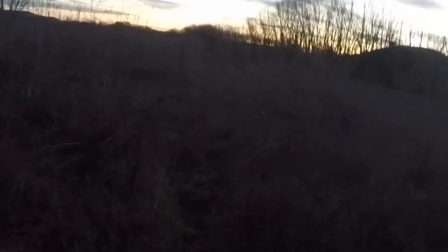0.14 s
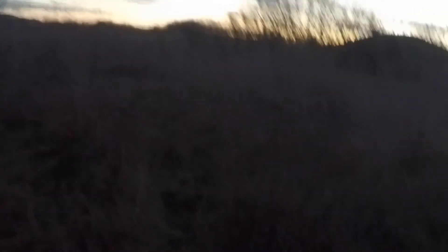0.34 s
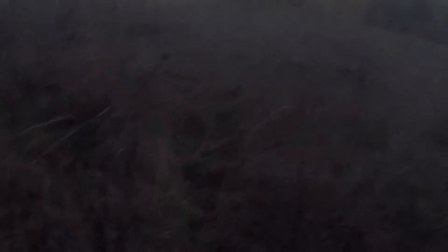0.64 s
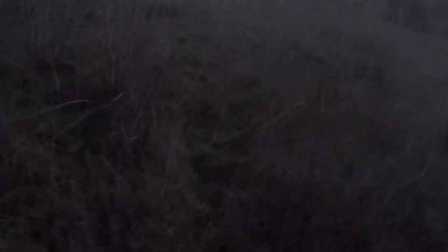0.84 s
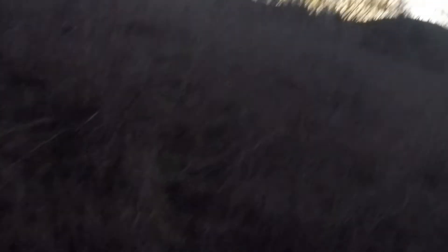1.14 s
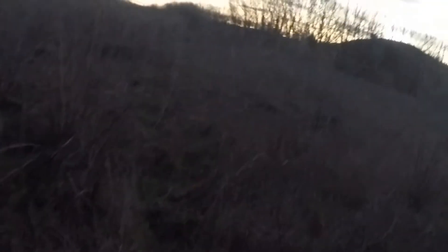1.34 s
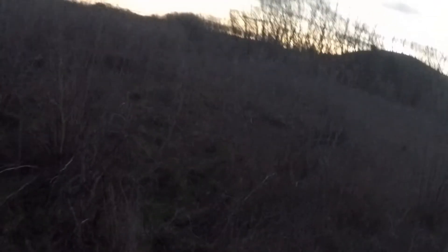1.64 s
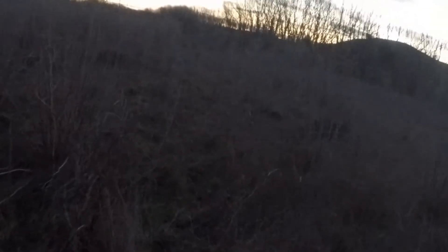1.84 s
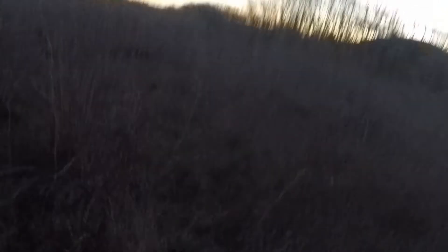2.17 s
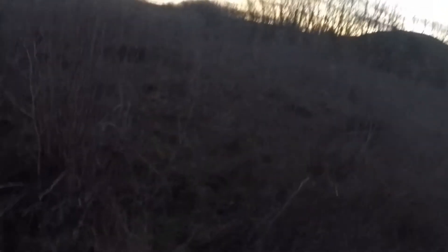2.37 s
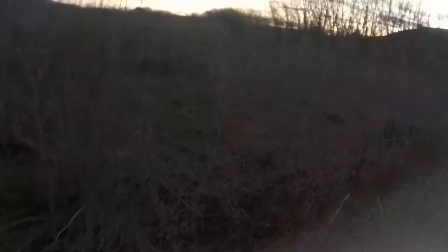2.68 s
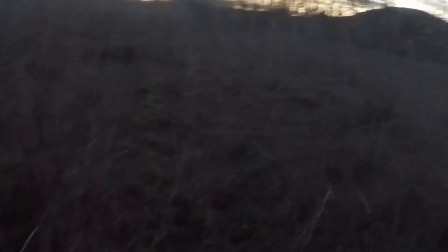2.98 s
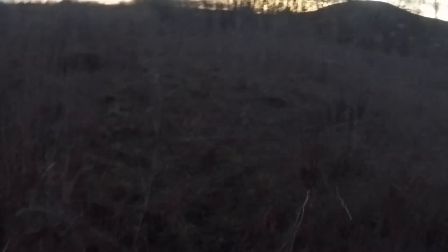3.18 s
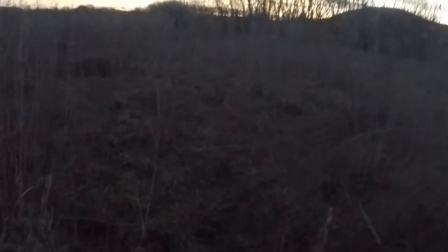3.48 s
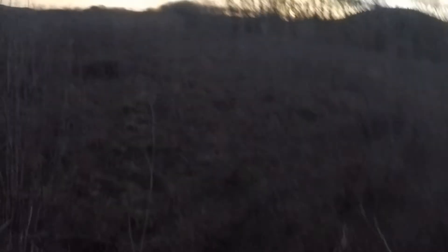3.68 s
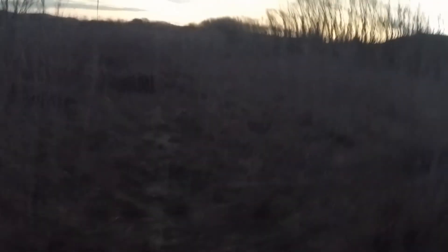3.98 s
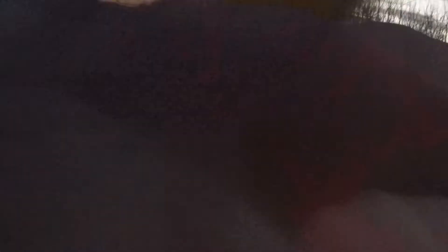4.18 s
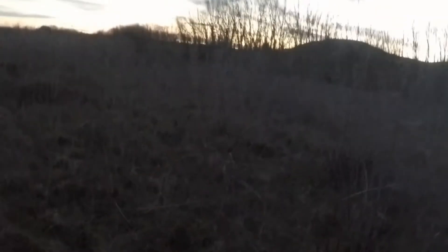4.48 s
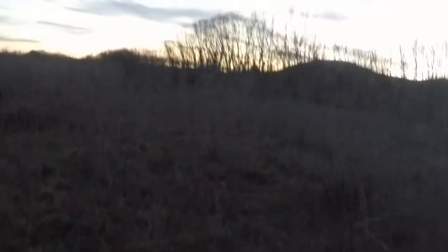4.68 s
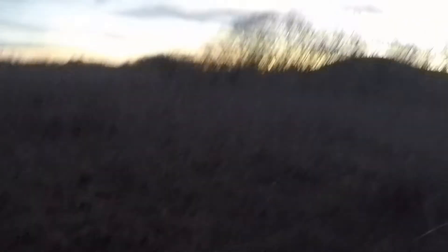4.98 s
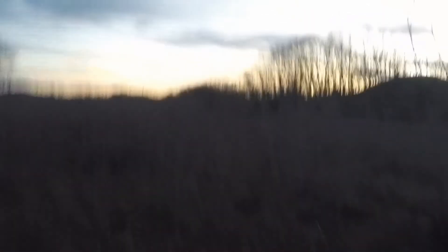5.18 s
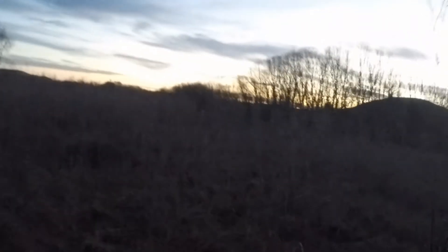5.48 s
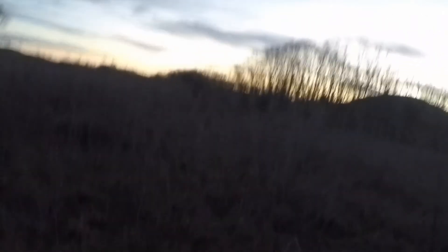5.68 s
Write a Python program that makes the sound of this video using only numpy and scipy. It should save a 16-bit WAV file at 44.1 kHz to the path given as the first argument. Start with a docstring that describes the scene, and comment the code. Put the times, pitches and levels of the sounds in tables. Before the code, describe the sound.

Someone carries a small camera through dry grass on a quiet hillside. Soft rustling and a low hand rumble run underneath as fingers and stalks scrape over the housing in short, uneven strokes. From about halfway, the grip shifts with sharp clicks, knocks and dull thumps right at the microphone. The loudest cracks come near the end and briefly overload it, then the noise dies down. There is no echo.

```python
"""A hand-held camera in dry grass.

Someone walks over a quiet hillside with a small camera in the hand. Fingers and stalks scrape over
the housing by stick-slip friction. Shifts of the grip excite its resonances as clicks and knocks and
push low thumps into the microphone; the loudest peaks overload it. The movement of the hand makes
a low rumble, and the grass rustles underneath."""
import sys
import numpy as np
from scipy import signal
from scipy.fft import rfft, irfft, next_fast_len
from scipy.io import wavfile
from scipy.ndimage import uniform_filter1d

SR = 44100
rng = np.random.default_rng(int(sys.argv[2]) if len(sys.argv) > 2 else 0)


def to_wav(s):
    """Save 16-bit WAV."""
    ch = np.atleast_2d(s).T  # columns
    pcm = np.round(np.clip(ch, -1, 1) * 32767)  # PCM
    wavfile.write(sys.argv[1], SR, pcm.astype(np.int16))


N = 256794
TIME = np.arange(N) / SR
FFT_SIZE = next_fast_len(N + 4096)
FREQS = np.maximum(np.arange(FFT_SIZE // 2 + 1) * SR / FFT_SIZE, 1)

# Resonances of the housing. Each row: centre in Hz, bandwidth in Hz, boost in dB.
HOUSING_MODES = [(630, 120, 4), (910, 180, -0.5), (1400, 94, -2.5), (2090, 310, 0.5), (2464.3, 68, 4),
                 (3460, 1000, 4), (4400, 160, 7), (9700, 900, 0)]
# Unrest of the carrying hand. Each row: time in seconds, relative rumble level in dB.
HAND_SWAY = [(0.0, -35.5), (0.37, -41), (0.68, -43.5), (1.52, -31.5), (1.81, -40.5), (3.01, -25.5),
             (3.45, -28), (3.96, -21.5), (4.2, -39), (5.25, -27), (5.44, -50), (5.82, -51)]


def scrapes(catch_s=0.0025, release_s=0.006, judder_db=1.44, judder_per_s=140, gain_db=0.22):
    """Sliding friction excites the housing: each stroke catches abruptly, judders and trails off."""
    # Short strokes. Each row: start and length in seconds, crest as a share of the length, crest level
    # in dB, fade after the crest in dB, hiss and body in dB relative to the level.
    short_strokes = [(0.235, 0.083, 0.31, -64, 3, 12, -21), (0.718, 0.081, 0.51, -49, 6, -35, -8),
                     (0.896, 0.115, 0.2, -37, 2.5, -2, -14), (1.021, 0.12, 0.18, -49, 8.5, -30, -15),
                     (1.897, 0.058, 0.28, -43.5, 7, -17, -4), (2.055, 0.054, 0.43, -47.5, 8, -13.5, -9.5),
                     (2.16, 0.087, 0.44, -42, 4.5, -9, 2), (2.256, 0.13, 0.066, -38, 10, -19.5, -6.5),
                     (2.391, 0.093, 0.38, -33, 1, -11.5, -13.5), (2.484, 0.053, 0.78, -26, 5, -4.5, -14),
                     (2.562, 0.027, 0.45, -21.5, 17.5, -15, -9), (2.717, 0.048, 0.076, -39, 10, -8, -3.5),
                     (2.765, 0.056, 0.13, -30, 5.5, -5, -6.5), (2.825, 0.088, 0.66, -31, 8.5, 0.5, -3),
                     (2.943, 0.024, 0.38, -42, 6, -16, -3), (2.97, 0.15, 0.14, -29.5, 11, -7, -8),
                     (3.124, 0.054, 0.13, -41.5, 11, -4.5, -4), (3.184, 0.039, 0.64, -36, 10, -7.5, -1.5),
                     (3.235, 0.056, 0.25, -33, 17.5, -15.5, -9), (3.33, 0.061, 0.63, -31.5, 7, -3, -9.5),
                     (3.41, 0.042, 0.61, -32.5, 16, -7, -7.5), (3.468, 0.11, 0.24, -24.5, 19.5, -6.5, -7.5),
                     (3.591, 0.16, 0.14, -28.5, 18.5, -13, -11), (3.889, 0.028, .35, -40, 7.5, -27, -27),
                     (4.032, 0.04, .1, -26.5, 2.5, -14, -15), (4.069, 0.013, 0.16, -26.5, 1, -10, -15),
                     (4.401, 0.026, .1, -34, 13.5, -0.5, -24), (5.065, 0.021, 0.7, -37.5, -1, -15, -3),
                     (5.215, 0.064, .2, -49, 11, -6, -21), (5.698, 0.12, 0.17, -51.5, 1, -10, -14.5)]
    # Two long drags. Each row: time in seconds, level in dB, hiss and body in dB relative to the level.
    first_drag = [(1.143, -40.5, -14, -9.5), (1.223, -35.5, -10, -22), (1.293, -34, -11, -13),
                  (1.375, -26.5, -14, -13.5), (1.445, -28, -16, -10.5), (1.485, -34.5, -19, -22.5),
                  (1.579, -30, -8, -16), (1.611, -41, -17, -10), (1.679, -31.5, -8, -12.5),
                  (1.781, -38.5, -30.5, -11), (1.833, -46.5, -24, -5), (1.895, -48, -16, -6)]
    second_drag = [(4.527, -34, -8, -1), (4.545, -26, -10, -18.5), (4.583, -37, -5, -8),
                   (4.619, -26, -14.5, -28), (4.659, -41, -11, -15), (4.687, -27.5, -23.5, -15),
                   (4.703, -41.5, -8, -8), (4.765, -37, -28.5, -11), (4.795, -33.5, -15, -13.5),
                   (4.828, -39, -16.5, -6), (4.865, -35, -14, -4), (4.919, -40, -22, 0),
                   (4.976, -51, -9, -12)]
    # Spectrum of a scrape. Each row: frequency in Hz, relative spectral density in dB.
    spectrum = [(76, -13.5), (130, -4), (464, -24.5), (637, -14), (967, -7.5), (1330, -7), (2060, -0.5),
                (2720, -5.5), (4380, -13.5), (5030, -14.5), (15000, -30)]
    # Emphasis of the upper middle band. Each row: time in seconds, gain in dB.
    emphasis = [(0.9, -1.5), (1.4, -3.5), (1.8, -3.5), (2.5, -2.5), (3.5, 3), (4.1, 3), (4.55, -6.5),
                (4.95, -5)]
    strokes = sorted([stroke_course(*row) for row in short_strokes] + [first_drag, second_drag])
    level_db, hiss_db, body_db = curves(sorted(tuple(row) for stroke in strokes for row in stroke))
    noise = coloured(stick_slip(slips_per_s=2800, spread_db=3.4, hiss=0.6), spectrum, HOUSING_MODES)
    sliding = modulated(noise, level_db + body_db, level_db, level_db + hiss_db,
                        flicker_db=2.0, flicker_per_s=35)
    upper_middle = filtered(sliding, (2900, 5600), "band", order=1)
    sliding += (from_db(curves(emphasis)[0]) - 1) * upper_middle
    sliding *= from_db(gain_db + judder_db * drift(judder_per_s))
    out = np.zeros(N)
    next_starts = [stroke[0][0] for stroke in strokes[1:]] + [np.inf]
    for stroke, next_start in zip(strokes, next_starts):
        start, end = stroke[0][0], stroke[-1][0]
        during = (TIME > start - catch_s / 2) & (TIME < min(end + 5 * release_s, next_start))
        t = TIME[during]
        catch = np.clip((t - start) / catch_s + 0.5, 0, 1)
        release = np.exp(-np.maximum(t - end, 0) / release_s)
        out[during] += catch * release * moving_contact(sliding[during])
    return out


def stroke_course(start, length, crest, level_db, fade_db, hiss_db, body_db):
    """Friction grows louder and brighter with pressure, which builds to a crest and then eases."""
    catch_db, swell_db_per_s = 5.5, 67
    hiss_growth, body_growth = 0.24, -0.22  # dB for each dB of pressure
    rise_s = length * np.clip(crest, 0.02, 0.98)
    times = [start, start + rise_s, start + length]
    below_crest_db = [catch_db + swell_db_per_s * rise_s, 0, fade_db]
    return [(s, level_db - drop, hiss_db - hiss_growth * drop, body_db - body_growth * drop)
            for s, drop in zip(times, below_crest_db)]


def stick_slip(slips_per_s, spread_db, hiss):
    """Stick-slip friction releases tiny impulses of uneven size at random, over a smooth hiss."""
    sizes = from_db(spread_db * np.minimum(rng.exponential(1, N), 4)) * rng.choice([-1, 1], N)
    slips = sizes * (rng.random(N) < slips_per_s / SR)
    return slips / rms(slips) + hiss * rng.standard_normal(N)


def moving_contact(sound, ripple_db=4.0, dwell_s=0.11):
    """Mode excitation depends on the contact point: one pattern of resonances fades into the next."""
    size = next_fast_len(len(sound) + 2)
    spectrum = rfft(sound, size)
    hz = np.arange(size // 2 + 1) * SR / size
    ripple_axis = np.sqrt(hz * 2000) * 2 / 130  # knots 130 Hz apart at 2 kHz, wider above
    places = int(len(sound) / SR / dwell_s) + 1
    position = np.linspace(0, places - 1, len(sound))
    out = 0
    for place in range(places):
        knots = rng.standard_normal(SR // 80)
        ripple = from_db(ripple_db * np.interp(ripple_axis, np.arange(len(knots)), knots))
        crossfade = np.clip(1 - abs(position - place), 0, 1)
        out += crossfade * irfft(spectrum * ripple / rms(ripple), size)[:len(sound)]
    return out


def rasps(t60=0.02, gain_db=3.0):
    """Forced vibration: friction drives one narrow resonance for the length of a slide."""
    # Pitched slides. Each row: start and length in seconds, pitch in Hz, relative level in dB.
    slides = [(0.739, 0.043, 1400, -51.5), (0.74, 0.035, 2230, -49), (0.892, 0.095, 3510, -35),
              (1.284, 0.086, 700, -49), (2.771, 0.061, 2230, -32), (2.83, 0.069, 956, -34),
              (2.972, 0.045, 850, -36.5), (3.594, 0.035, 4400, -33), (4.6, 0.11, 1990, -48)]
    out = np.zeros(N)
    for start, length, hz, db in slides:
        size = int(length * SR)
        tone = ring(rng.standard_normal(SR // 2)[:size], hz, t60)
        add(out, start, from_db(db + gain_db) * tone / rms(tone) * signal.windows.tukey(size))
    return out


def clicks(ring_cycles=5, chatter_s=0.0015, tail_s=0.012, snap_s=0.0012, crack_s=0.00048, gain_db=-2.5):
    """A hard impact is broadband: a brief tone and housing modes sound with a snap, crack and push."""
    # Clicks of the grip. Each row: time in seconds, relative level in dB, pitch in Hz, brightness in dB.
    impacts = [(0.385, -40.5, 1550, 7.5), (0.418, -40, 1770, -20), (2.5738, -7.5, 1490, -11),
               (2.715, -20.5, 3420, -1), (2.7709, -9.5, 2300, -14), (2.975, -13.5, 950, -14),
               (3.34, -12, 1690, -7), (3.7128, -7, 1920, 2.5), (3.756, -14.5, 2310, -18),
               (3.7976, -8.5, 1600, -17), (3.8222, -0.5, 1900, -30), (3.933, -8, 2130, -39),
               (3.9564, -5.5, 1890, -23.5), (3.9651, 3, 2100, -9), (3.9748, 0.5, 2700, -4),
               (4.076, 4.5, 2510, -4), (4.0914, -10.5, 2130, 3.5), (4.3986, -19.5, 1760, -1),
               (4.5306, -18, 1990, -22.5), (4.9865, -9.5, 1750, -1), (4.9999, -7.5, 3150, 0),
               (5, -5, 9500, -12), (5.0236, -6.5, 2240, 7), (5.0255, -2, 2300, -6.5),
               (5.0605, -13.5, 2090, -45), (5.118, 12.5, 1900, -5), (5.2649, -19, 1380, -7),
               (5.273, -22, 3770, -19.5), (5.3863, -18.5, 1930, -3), (5.716, -26.5, 1990, -42)]
    out, t = np.zeros(N), TIME[:SR // 24]
    impulse = 1.0 * (t == 0) + 1e-18
    for start, db, hz, bright_db in impacts:
        chatter, crack_noise, strengths, shifts, snap_noise = rng.standard_normal((5, len(t)))
        chatter_decay = np.exp(-t / chatter_s) + from_db(-38) * np.exp(-t / tail_s)
        force = impulse + 0.32 * chatter * chatter_decay
        force = filtered(force, [hz / 2, min(4 * hz, SR / 3)], "band", order=1)
        modes = gripped_housing(force, hz, strengths, shifts)
        tap = filtered(impulse, [0.7 * hz, 2.2 * hz], "band", order=1)
        tone = ring(tap, hz, ring_cycles / hz)
        snap = filtered(snap_noise * np.exp(-t / snap_s), [1.1 * hz, 2.4 * hz], "band")
        crack = filtered(crack_noise * np.exp(-t / crack_s), [4000, 11000], "band")
        push = filtered(impulse, 480, "low")
        click = mix_peaks((tone, 0), (modes, 1), (snap, 0.09 * bright_db - 2),
                          (crack, bright_db - 7), (push, -15))
        add(out, start, from_db(db + gain_db) * click)
    return out


def gripped_housing(force, pitch_hz, strengths, shifts, focus_octaves=0.41, damping_hz=150, detune=0.037):
    """Modal response: modes near the click's pitch ring most, and the grip detunes and damps each."""
    out = 0
    for (hz, width_hz, _), strength, shift in zip(HOUSING_MODES, strengths, shifts):
        nearness = 1 / (1 + (np.log2(hz / pitch_hz) / focus_octaves) ** 2)
        loaded_hz = hz * np.exp(detune * shift)
        t60 = np.log(1000) / (np.pi * (width_hz + damping_hz))
        out += nearness * from_db(2 * strength) * ring(force, loaded_hz, t60)
    return out


def knocks(swing_cycles=0.35, push_cycles=0.32, grit_s=0.001):
    """Soft flesh damps the housing within about three cycles, with a push of air and a little grit."""
    # Fingertip knocks, the first four a quick creak. Each row: time in seconds, level in dB, pitch in Hz.
    taps = [(1.829, -29.5, 1050), (1.84, -31, 1050), (1.847, -31, 1050), (1.86, -26, 1090),
            (3.653, -14.5, 800), (3.7836, -12.5, 1150), (3.7852, -1.5, 1086), (3.7857, -7, 420),
            (5.1405, -11.5, 1400), (5.1616, -15, 1400), (5.265, -16, 257), (5.321, 4, 1364),
            (5.3436, -7.5, 1220), (5.365, -4.5, 1270)]
    out, t = np.zeros(N), TIME[:SR // 32]
    for start, db, hz in taps:
        cycles = hz * t
        swing = -np.sin(2 * np.pi * cycles) * cycles ** 2 * np.exp(-cycles / swing_cycles)
        push = -np.gradient(cycles ** 2 * np.exp(-cycles / push_cycles))
        grit = filtered(rng.standard_normal(len(t)) * np.exp(-t / grit_s), [2000, 4000], "band", order=1)
        add(out, start, from_db(db) * mix_peaks((swing, 0), (push, -9), (grit, -14.5)))
    return out


def pings():
    """Free vibration: with no finger to damp it, the housing rings on briefly after a blow."""
    # Blows on the housing. Each row: time in seconds, strength in dB.
    blows = [(2.575, -19.5), (4.077, -5.5)]
    # Freely ringing modes. Each row: frequency in Hz, gain in dB, time to fall 60 dB in seconds.
    free_modes = [(1855, -1.5, 0.071), (2380, -12.5, 0.02)]
    force = np.zeros(N)
    for start, db in blows:
        add(force, start, from_db([db]))
    return sum(from_db(db) * ring(force, hz, t60) for hz, db, t60 in free_modes)


def thumps(decay_cycles=0.41, onset_cycles=0.079, gain_db=5.5):
    """Heavily damped oscillation: a push of the hand sends one pressure swing into the microphone."""
    # Pushes of the hand. Each row: time in seconds, relative level in dB, frequency in Hz.
    pushes = [(1.387, -15, 42), (1.852, -27, 95), (2.557, -6.5, 41), (2.581, -11, 55), (2.759, -14, 53),
              (2.794, -8, 60), (2.88, -13, 52), (3.65, -7, 44), (3.679, -3.5, 39.6), (3.786, -1.5, 90),
              (3.978, -6.5, 38), (4.044, -3, 69.3), (4.088, -3.5, 39.5), (4.99, -8.5, 41.3),
              (5.027, -4, 169.7), (5.033, -6.5, 38.75), (5.266, -7.5, 80)]
    out, t = np.zeros(N), TIME[:SR // 5]
    for start, db, hz in pushes:
        cycles = hz * t
        envelope = (1 - np.exp(-cycles / onset_cycles)) * np.exp(-cycles / decay_cycles)
        add(out, start, -from_db(db + gain_db) * np.sin(2 * np.pi * cycles) * envelope)
    return filtered(out, 9.2, "high", order=1)


def rumble(gain_db=2.0, levelling_s=0.045, upper_hz=44, upper_growth=0.72):
    """Structure-borne noise swells with the movement of the hand; brisk movement reaches higher."""
    # Spectrum of the rumble. Each row: frequency in Hz, relative spectral density in dB.
    spectrum = [(16, 6.5), (30, 7.5), (47, -0.5), (66, -10.5), (130, -33), (300, -41), (2000, -120)]
    noise = coloured(rng.standard_normal(N), spectrum)
    local_power = uniform_filter1d(abs(signal.hilbert(noise)) ** 2 / 2, int(levelling_s * SR))
    even = noise / np.sqrt(local_power + 1e-12)
    upper = filtered(filtered(even, upper_hz, "high")[::-1], upper_hz, "high")[::-1]  # zero phase
    sway_db, = curves(HAND_SWAY)
    level_db = with_jolts(sway_db)
    brisk_db = (level_db + sway_db) / 2
    lift_db = np.minimum(upper_growth * (brisk_db - np.median(brisk_db)), 3.0)
    return (even + upper * (from_db(lift_db) - 1)) * from_db(level_db + gain_db)


def with_jolts(sway_db, rise_s=0.028, fall_s=0.031):
    """Incoherent sources add in power: each jolt swells and dies away on top of the hand's unrest."""
    # Jolts of the walk that reach the camera. Each row: time in seconds, relative level in dB.
    jolts = [(0.37, -27), (0.96, -30.5), (1.39, -20.5), (1.85, -30.5), (2.18, -25), (2.56, -16.5),
             (2.79, -16.5), (3.28, -25.5), (3.68, -20.5), (4.07, -15.5), (4.36, -25), (4.63, -22),
             (5.02, -17), (5.29, -21), (5.399, -26), (5.719, -32)]
    power = from_db(sway_db) ** 2
    for crest_s, db in jolts:
        away = np.maximum((crest_s - TIME) / rise_s, (TIME - crest_s) / fall_s)
        power += from_db(db) ** 2 * np.exp(-np.minimum(away ** 2, 20))
    return 10 * np.log10(power)


def grass(body_db=-8.0, mean_hiss_db=-72, hiss_growth=0.24):
    """Friction of dry blades around the legs: many small slips merge into a soft crackle."""
    # Course of the rustle. Each row: time in seconds, level of the middle band in dB.
    levels = [(0, -61.5), (0.45, -57.5), (0.7, -65), (0.83, -55.5), (1.1, -58), (2.02, -59), (2.66, -56),
              (3.9, -44.5), (4.13, -49.5), (4.2, -72.5), (4.35, -61), (4.48, -59.5), (5.15, -45),
              (5.48, -63.5), (5.57, -77), (5.82, -63)]
    # Spectrum of the rustle. Each row: frequency in Hz, relative spectral density in dB.
    spectrum = [(130, -5.5), (260, 0.5), (530, -7.5), (1500, -5), (5000, -6.5), (7400, -1.5),
                (15000, -14.5)]
    level_db, = curves(levels)
    hiss_db = mean_hiss_db + hiss_growth * (level_db - level_db.mean())
    noise = coloured(stick_slip(slips_per_s=760, spread_db=1.0, hiss=0.97), spectrum, HOUSING_MODES)
    return modulated(noise, level_db + body_db, level_db, hiss_db, flicker_db=3.0, flicker_per_s=24)


def modulated(noise, body_db, mid_db, hiss_db, flicker_db, flicker_per_s):
    """Amplitude modulation: half-octave bands follow three level curves, each with its own flicker."""
    zones = [(body_db, (400, 1100)), (mid_db, (1200, 3200)), (hiss_db, (5000, 15000))]
    gains_db = np.array([db - 20 * np.log10(rms(filtered(noise, edges_hz, "band", order=4)))
                         for db, edges_hz in zones])
    anchors_hz = [750, 1600, 2500, 6500]
    # Weights of body, middle and hiss. Each row: that zone's share at each anchor frequency.
    weights = [[0.94, 0.061, 0.0011, 0.0056], [0.01, 0.93, 0.98, 0.0042], [0.059, 0, 0.074, 0.97]]
    spectrum, out = rfft(noise, FFT_SIZE), 0
    for hz in 62.5 * 2 ** np.arange(0.5, 8.1, 0.5):
        triangle = np.clip(1 - 2 * abs(np.log2(FREQS / hz)), 0, 1)
        band = irfft(spectrum * triangle, FFT_SIZE)[:N]
        shares = np.array([np.interp(np.log(hz), np.log(anchors_hz), row) for row in weights])
        out += band * from_db(shares @ gains_db + flicker_db * drift(flicker_per_s))
    return out


def coloured(x, spectrum, resonances=()):
    """Source-filter shaping: x takes on a broad spectrum with resonance peaks on top."""
    hz, db = np.transpose(spectrum)
    shape_db = np.interp(np.log(FREQS), np.log(hz), db)
    for centre, width, peak_db in resonances:
        shape_db += peak_db / (1 + (2 * (FREQS - centre) / width) ** 2)
    low_cut = 1 / np.sqrt(1 + (hz[0] / FREQS) ** 8)
    return irfft(rfft(x, FFT_SIZE) * from_db(shape_db) * low_cut, FFT_SIZE)[:N]


def ring(x, hz, t60):
    """Damped resonator: a unit impulse starts a unit sine that falls 60 dB in t60 seconds."""
    radius, angle = np.exp(-np.log(1000) / (t60 * SR)), 2 * np.pi * hz / SR
    return signal.lfilter([0, np.sin(angle)], [1, -2 * radius * np.cos(angle), radius ** 2], x + 1e-18)


def drift(per_s):
    """Slow random fluctuation with an RMS of 1."""
    knots = rng.standard_normal(int(N / SR * per_s) + 3)
    wander = np.interp(TIME * per_s + rng.random(), np.arange(len(knots)), knots)
    return wander / rms(wander)


def filtered(x, hz, kind, order=2):
    """Maximally flat filter, its corners held between 10 Hz and 0.45 SR."""
    sections = signal.butter(order, np.clip(hz, 10, 0.45 * SR), kind, fs=SR, output="sos")
    return signal.sosfilt(sections, x)


def curves(rows):
    """Linear interpolation of timed rows, one curve for each column after the time."""
    times, *columns = np.transpose(rows)
    return [np.interp(TIME, times, column) for column in columns]


def mix_peaks(*parts):
    """Superposition of (sound, dB) pairs, each scaled to that peak level."""
    return sum(from_db(db) * sound / abs(sound).max() for sound, db in parts)


def add(out, start_s, sound):
    """Superposes a sound on out from start_s."""
    at = round(start_s * SR)
    out[at:at + len(sound)] += sound[:N - at]


def from_db(db):
    """Decibels to amplitude ratio."""
    return 10 ** (np.asarray(db) / 20)


def rms(x):
    """Root mean square."""
    return np.sqrt(np.mean(x ** 2) + 1e-20)


def scene():
    """Free field: all sources add close to the one microphone, and the open hillside gives no echo."""
    return (scrapes() + rasps() + grass() + rumble() + clicks() + knocks() + thumps() + pings())[None]


def record(dry):
    """Overload clips the loudest peaks, and a steep low-pass limits the bandwidth to 15.4 kHz."""
    low_pass = signal.ellip(10, 0.1, 90, 15400, fs=SR, output="sos")
    return signal.sosfilt(low_pass, np.clip(dry, -0.85, 0.85))


dry = scene()
out = record(dry)
to_wav(out)
```